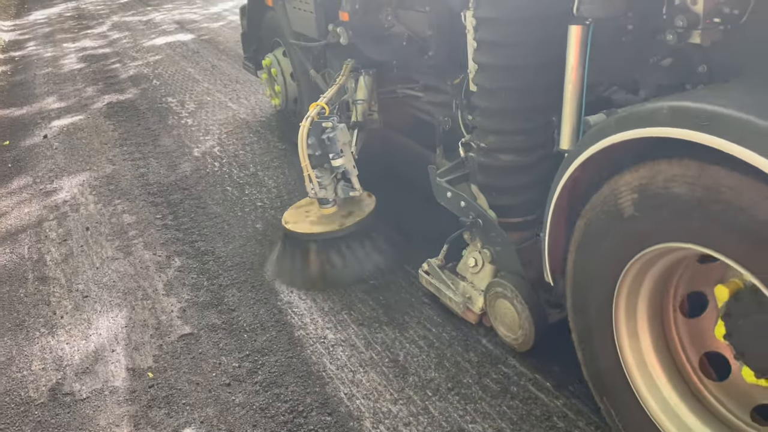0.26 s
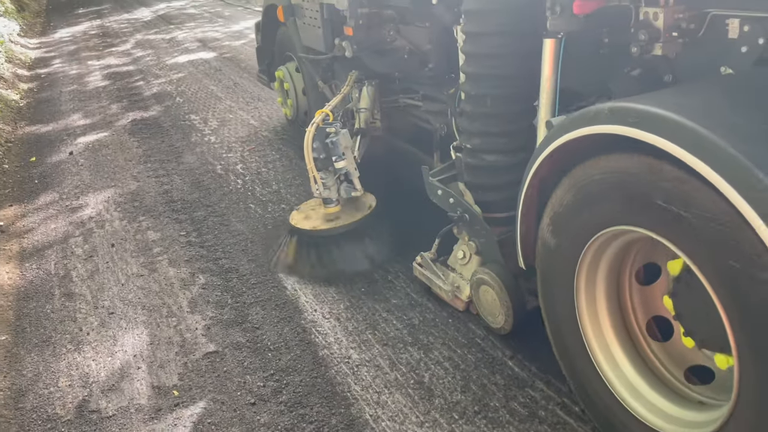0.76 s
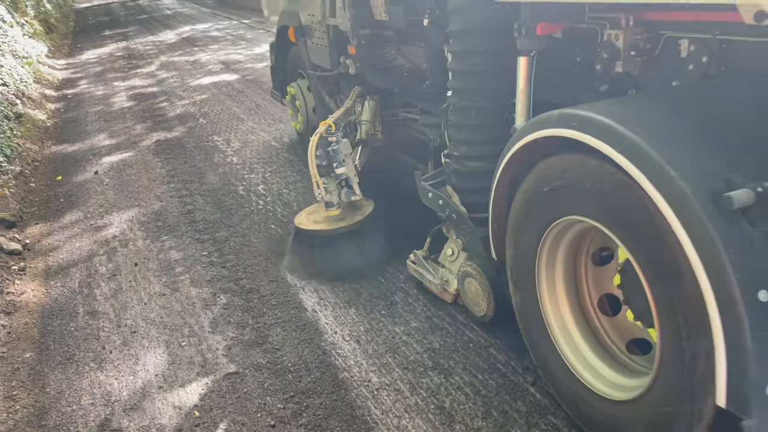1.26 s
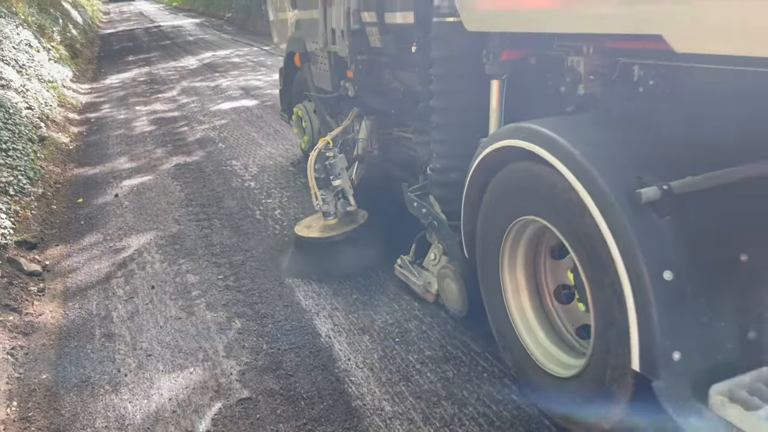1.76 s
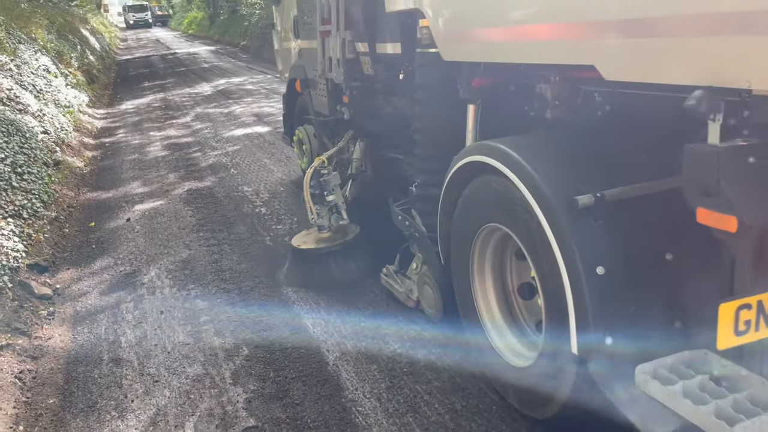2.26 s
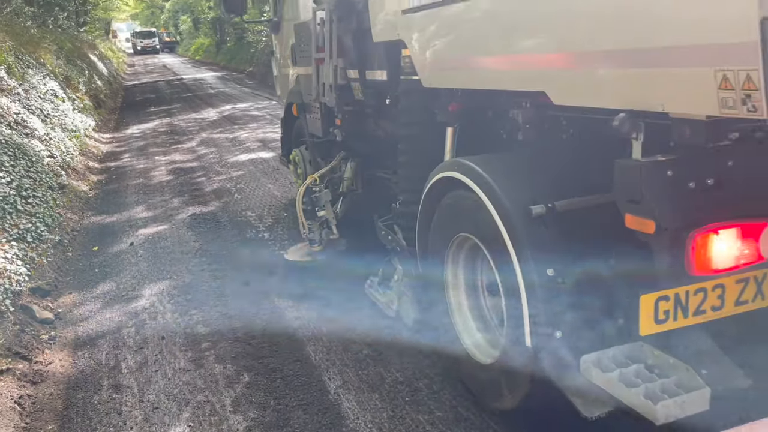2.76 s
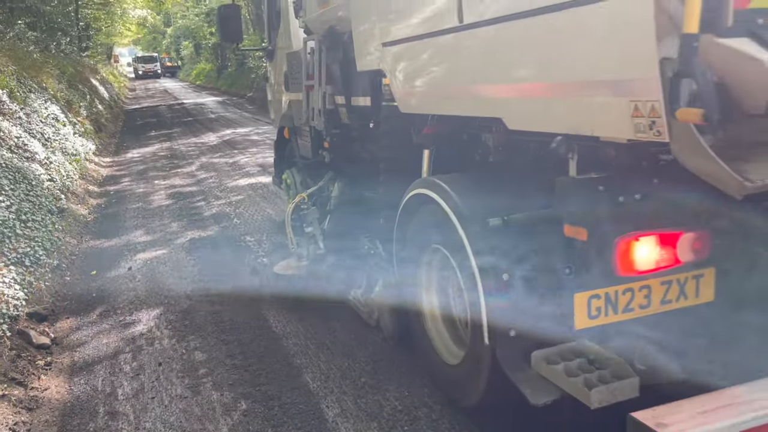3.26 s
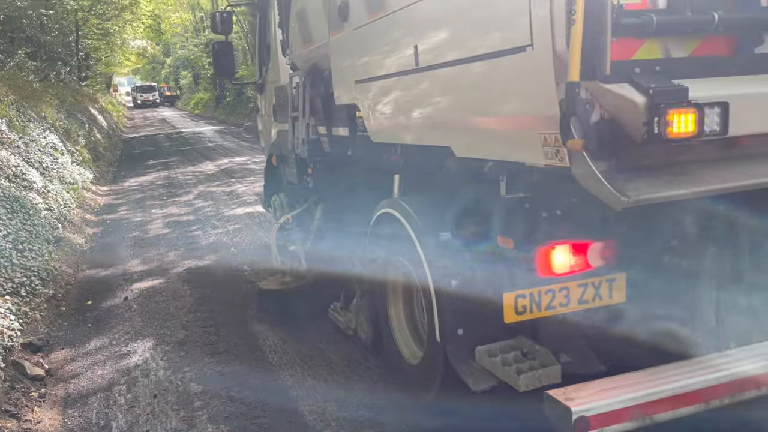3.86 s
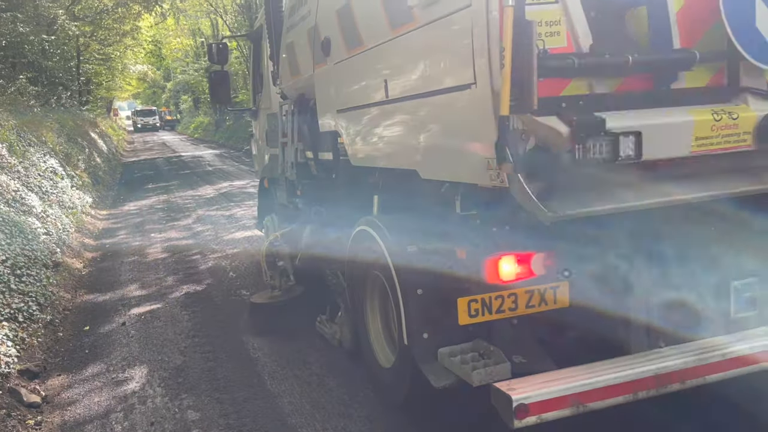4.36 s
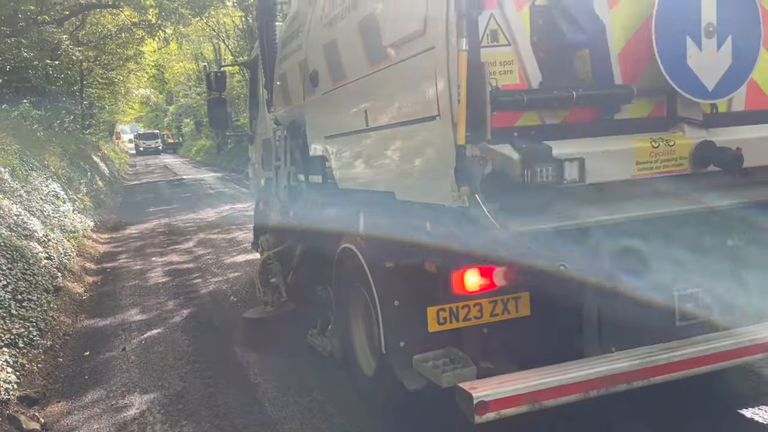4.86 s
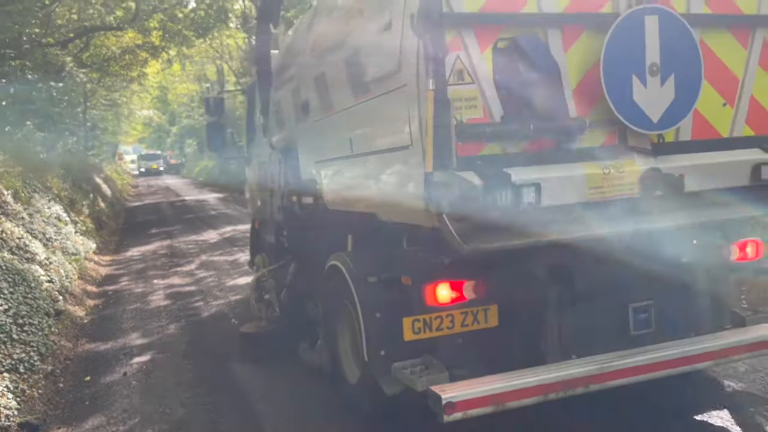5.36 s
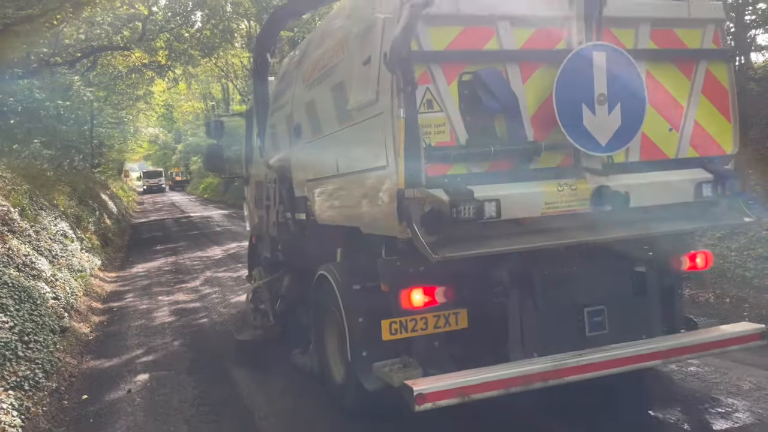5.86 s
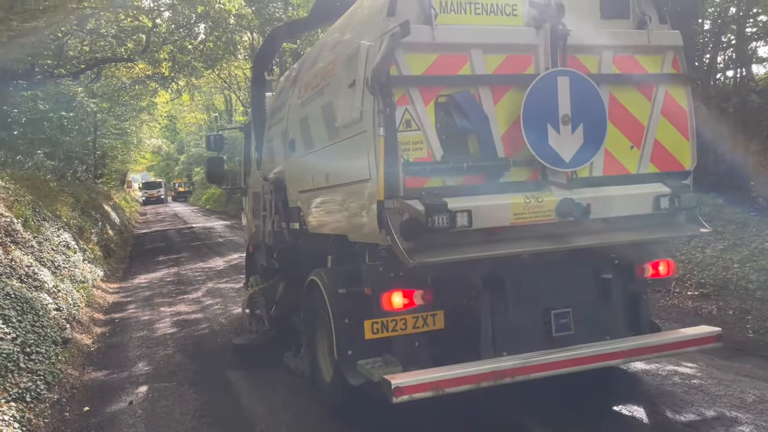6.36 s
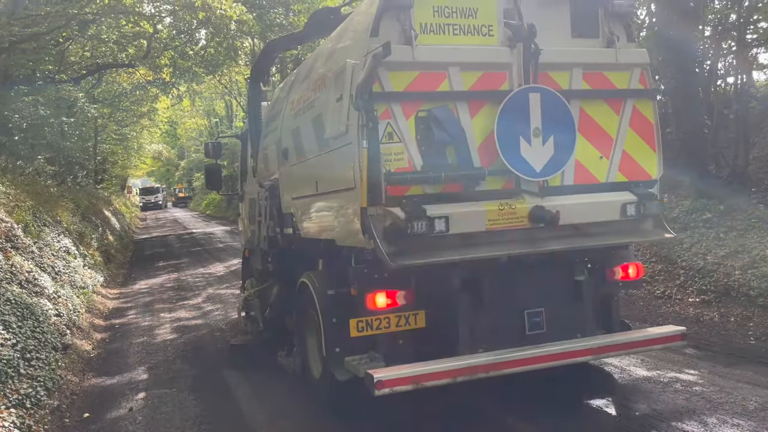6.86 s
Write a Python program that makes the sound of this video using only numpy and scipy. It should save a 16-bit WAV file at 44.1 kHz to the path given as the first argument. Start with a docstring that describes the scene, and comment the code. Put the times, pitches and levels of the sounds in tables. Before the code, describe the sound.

Outdoors on a lane, close to a slowly moving road sweeper, a dense steady rush runs throughout: bright, wide bristle hiss above a midrange roar of sucked air, with low tyre and body rumble and an uneven diesel hum beneath. A medium-pitched fan whine is clearest at the start, fading by 1 second, its overtones fluttering in and out. Near 0.8 seconds comes a soft low thud, and hollow hose notes open up, strong until about 2, then receding. Thin, faint high squeaks appear around 1.9-2.6 seconds, near 4.1, and occasionally after 5.7. Faint hydraulic whines waver inside. From about 3 seconds the brush and nozzle weaken slightly while a low, rough hopper drone grows. After 4 it chugs with irregular booming puffs and short lulls. From 5.8 gusts buffet the microphone, and the heaviest puffs come at 6.7-7 seconds, still running at the end.

```python
"""Bristles hiss on asphalt and air roars in a suction nozzle as a road sweeper crawls past along a lane.
A diesel hums at its firing rate and multiples, a fan whines at its blade rate, hydraulics whine faintly.
The viewpoint moves from the brushes to the tail: the fan's outlet drones louder through the hopper,
puffs boom in it and draught buffets the microphone. A small wheel squeaks faintly now and then.
Rushing sources are shaped noise in two ports; tonal ones are sines with wavering pitch or level."""
import sys
import numpy as np
from scipy import signal
from scipy.fft import rfft, irfft
from scipy.io import wavfile
from scipy.ndimage import uniform_filter1d

SR = 44100
rng = np.random.default_rng(int(sys.argv[2]) if len(sys.argv) > 2 else 0)


def transcribe(signal):
    """Save signal, clipped to [-1, 1], as a 16-bit WAV file at the path in sys.argv[1]."""
    frames = np.atleast_2d(signal).T
    limited = np.clip(frames, -1, 1)
    pcm = np.round(limited * 32767).astype(np.int16)
    wavfile.write(sys.argv[1], SR, pcm)


N = 313110
TIME = np.arange(N) / SR

# viewpoint, 0 beside the brushes, 1 behind the truck: time_s, viewpoint
VIEWPOINT = [(0, 0.11), (1.2, 0.0017), (2.6, 0.14), (4.2, 0.73), (5.5, 0.89), (7.1, 1)]
# brief swells and dips of the bass: middle_s, length_s, change_db
BASS_SWELLS_AND_DIPS = [(.04, .2, -4), (.27, .2, 4), (.8, 0.24, 3), (1.0, .1, -7), (1.2, .18, -11),
                        (1.64, 0.14, 4.5), (1.8, .12, -3), (2.07, 0.11, -6), (2.38, .16, 6),
                        (2.67, 0.15, 4), (2.87, .14, -6), (4.15, .25, 2), (4.5, 0.18, 4), (4.66, 0.14, -6),
                        (5.0, 0.38, -6), (5.35, 0.22, -5), (5.73, 0.22, 5.5), (5.96, .12, -12),
                        (6.1, .14, 5), (6.28, .16, -16), (6.39, .07, -8), (6.48, 0.14, 5.5),
                        (6.6, 0.25, -20)]
# puffs of exhaust air that make the hopper boom: peak_s, length_s, pitch_hz, level_db
PUFFS = [(.71, .07, 205, -22), (1.66, .09, 198, -27), (1.78, .08, 200, -27), (2.03, .08, 205, -28),
         (2.727, 0.18, 194, -23.5), (3.98, .08, 172, -24), (4.06, .08, 207, -25), (4.28, 0.087, 190, -24),
         (4.385, .08, 193, -24), (4.55, .07, 180, -24), (4.735, 0.07, 215, -22.5), (4.8, .06, 190, -24),
         (4.95, .1, 200, -24.5), (5.135, .08, 194, -23.5), (5.215, .08, 196, -24), (5.327, 0.088, 201, -21),
         (5.754, 0.2, 196, -22.5), (6.111, 0.085, 210, -20), (5.98, .07, 210, -24), (6.26, .08, 192, -24),
         (6.417, 0.18, 206, -25.5), (6.718, .14, 205, -16), (6.905, .08, 198, -16), (7.01, 0.14, 206, -18)]


def gain_of(db):
    """Decibels to amplitude."""
    return 10 ** (np.asarray(db) / 20)


def evened(x):
    """Scales to unit rms."""
    return x / np.sqrt(np.mean(x ** 2) + 1e-20)


def curves(table, t):
    """Every column of a time table, read at the times t."""
    s, *columns = np.transpose(table)
    return [np.interp(t, s, c) for c in columns]


def read(table, hz):
    """Every column of a frequency table, read on a log axis."""
    f, *columns = np.transpose(table)
    return [np.interp(np.log(hz + 1), np.log(f + 1), c) for c in columns]


def seen(table, hz, t):
    """Blends a table's beside and behind columns as the truck moves on."""
    beside, behind = read(table, hz)
    return beside + (behind - beside) * curves(VIEWPOINT, t)[0]


def facing(beside_db, behind_db):
    """Level of a source as the viewpoint moves from the truck's side to its tail."""
    return beside_db + (behind_db - beside_db) * curves(VIEWPOINT, TIME)[0]


def skirts(table, hz):
    """Fall of 24 dB an octave outside the range of a spectrum."""
    inside = np.clip(hz + 1, table[0][0], table[-1][0])
    return -24 * abs(np.log2((hz + 1) / inside))


def wander(rate_hz):
    """Slow chance of unit rms, up to about rate_hz swings a second."""
    hz = np.fft.rfftfreq(4096, TIME[-1] / 4096)
    spectrum = rfft(rng.standard_normal(4096))
    drift = irfft(spectrum * np.exp(-(hz / rate_hz) ** 2) * (hz > 0))
    return np.interp(TIME, np.linspace(0, TIME[-1], len(drift)), evened(drift))


def turns(hz, waver, rate_hz):
    """Phase in radians of a rotation or tone whose rate wavers slightly."""
    return 2 * np.pi * np.cumsum(hz * (1 + waver * wander(rate_hz))) / SR


def bump(s, length_s, t):
    """A smooth swell from 0 to 1 and back, centred on s."""
    return np.cos(np.pi * np.clip((t - s) / length_s, -.5, .5)) ** 2


def swells_db(table, t):
    """Level change made by a table of brief swells and dips."""
    return sum(db * bump(s, length_s, t) for s, length_s, db in table)


def ramp(start_s, rise_s):
    """Rises from 0 to 1 and stays there."""
    return np.clip((TIME - start_s) / rise_s, 0, 1)


def placed(x, left_db):
    """A point source, louder in the left port by left_db."""
    return x * gain_of([[left_db / 2], [-left_db / 2]])


def rush(colour, patchy_db, size, even_above_hz=7500):
    """Turbulent noise of unit rms with drifting patches, as it arrives at the two ports."""
    # left minus right level: freq_hz, beside_db, behind_db
    balance = [(60, -1.5, 0.5), (220, 0, 3.8), (550, -1.5, 1.5), (724, 1, 5.6), (1150, 1.5, 1.5),
               (1500, 11, 6.6), (1850, 2.5, 6), (2260, 8.8, 5.8), (3470, 4, 3.9), (4450, 4.5, 7.7),
               (5330, 0.5, 7.9), (6300, 1, 0.5)]
    # left-right likeness, 0 to 1: freq_hz, beside, behind
    likeness = [(60, 1, 0.98), (220, 0.97, 1), (700, 0.91, 0.75), (1190, 0.86, 0.9), (1780, 0.54, 0.46),
                (2400, 0.96, 0.76), (3860, 1, 0.97), (5570, 1, 0.49), (7100, 0.74, 0.35), (7670, 1, 1),
                (8670, 1, 1), (9550, 0.22, 0.26), (10800, 1, 1), (12500, 0.93, 0.97), (13200, .55, .55),
                (14350, 1, 1)]
    # phase lead of the left port: freq_hz, lead_rad
    lead = [(60, 0), (1350, 0.09), (1700, -0.7), (2200, 0.5), (2900, 0.2), (3300, 0), (5400, -0.5),
            (6700, 0.4), (7700, -3), (8600, -3), (9900, -5), (10600, -6.5), (12600, -6), (13400, -8),
            (14400, -3 * np.pi)]
    hop = size // 4
    t = np.arange(N // hop + 5)[:, None] * hop / SR
    hz = np.fft.rfftfreq(size, 1 / SR)
    a, b, c, d, patches = rng.standard_normal((5, len(t), len(hz)))
    patches = uniform_filter1d(patches, size=4, axis=0)  # over time
    patches = evened(uniform_filter1d(patches, size=6, axis=1))  # over frequency
    same = np.clip(seen(likeness, hz, t), 0, 1)
    tilt = gain_of(seen(balance, hz, t) * (hz < even_above_hz))
    left = a + 1j * b
    right = same * left + np.sqrt(1 - same ** 2) * (c + 1j * d)
    right = right * np.exp(-1j * read(lead, hz)[0])
    ports = np.array([left * tilt, right]) / np.sqrt(1 + tilt ** 2)
    ports = ports * gain_of(colour(hz, t) + patchy_db * patches)
    noise = signal.istft(ports.transpose(0, 2, 1), nperseg=size, noverlap=size - hop)[1]
    return evened(noise[:, :N])


def cavity(centre, width_hz):
    """Rushing air narrowed by one resonance, whose pitch in Hz is centre(t)."""
    def colour(hz, t):
        return -20 * np.log10(1 + ((hz - centre(t)) / (width_hz / 2)) ** 2)
    return rush(colour, patchy_db=0.65, size=4096)


def boom(s, length_s, hz, db):
    """A low note that swells and dies within length_s, its pitch wavering."""
    return gain_of(db) * bump(s, length_s, TIME) * np.sin(turns(hz, waver=.02, rate_hz=20.0))


def chassis(beside_db=-28.5, behind_db=-30.5, swell_share=0.5, bass_top_hz=98):
    """Low rumble of the body and tyres; its deepest part briefly swells and sinks."""
    # rumble spectrum: freq_hz, level_db
    rumble = [(20, -29), (30, -23), (42, -9), (60, -3), (82, -1), (105, -4), (125, 1.5), (165, -2),
              (210, -6), (320, -59)]

    def colour(hz, t):
        bass_db = swell_share * swells_db(BASS_SWELLS_AND_DIPS, t) * (hz < bass_top_hz)
        return read(rumble, hz)[0] + skirts(rumble, hz) + bass_db
    return gain_of(facing(beside_db, behind_db)) * rush(colour, patchy_db=0.4, size=4096)


def thud():
    """One soft low thud, a swelling and dying tone."""
    # single row: peak_s, length_s, pitch_hz, level_db
    low_thud = (0.875, 0.14, 81.5, -23)
    return boom(*low_thud)


def wheel(waver=0.002, rough_db=2.0, trim_db=-0.7):
    """A small wheel sticks and slips in short, thin squeaks, some sagging in pitch."""
    # squeaks, pitch at the middle, level before trim: start_s, length_s, pitch_hz, glide_hz_per_s, level_db
    squeaks = [(1.89, .09, 6274, 0, -42.5), (1.99, .21, 6268, -30, -41.5), (2.2, .1, 6256, -100, -44.5),
               (2.28, .17, 6154, -80, -42.5), (2.48, .14, 6082, -450, -46), (4.06, .12, 6282, 0, -41.5),
               (4.17, .15, 6282, 0, -49.5), (4.39, .08, 6284, 0, -48.5), (5.74, .14, 6282, 0, -48.5),
               (6.24, .15, 6278, 0, -46.5), (6.45, .09, 6222, 0, -47), (6.57, .08, 6295, 0, -49.5)]
    out = np.zeros(N)
    drift = 1 + waver * wander(60)
    rough = gain_of(rough_db * wander(50))
    for s, length_s, hz, glide, db in squeaks:
        age_s = np.clip(TIME - s, 0, length_s)
        pitch_hz = (hz + glide * (age_s - length_s / 2)) * drift
        swell = np.sqrt(abs(np.sin(np.pi * age_s / length_s)))
        out += gain_of(db) * swell * np.sin(2 * np.pi * np.cumsum(pitch_hz) / SR)
    return placed(out * rough * gain_of(trim_db), left_db=1.0)


def pumps(flutter_db=2.5):
    """Faint wavering whines of the hydraulics."""
    # whines of pumps and drives: pitch_hz, beside_db, behind_db
    drives = [(421.6, -42.5, -41.5), (644, -47, -51), (848, -70, -52), (1102, -49.5, -57),
              (1857, -64, -55.5)]
    whine = np.zeros(N)
    for hz, beside_db, behind_db in drives:
        level_db = facing(beside_db, behind_db) + flutter_db * wander(3.8)
        whine += gain_of(level_db) * np.sin(turns(hz, waver=.002, rate_hz=7.0))
    return placed(whine, left_db=0.5)


def engine(firing_hz=66.57, beside_db=-33.0, behind_db=-34.0, uneven_db=0.8):
    """A governed diesel: the firing tone and a few of its multiples; the hum swells and sinks unevenly."""
    # firing orders: multiple_of_firing_rate, relative_db
    orders = [(1, 0), (2, -20), (3, -6.5), (5, -11), (6, -12)]
    phase = turns(firing_hz, waver=0.0019, rate_hz=3.0)
    hum = sum(gain_of(db) * np.sin(k * phase + 2 * np.pi * rng.random()) for k, db in orders)
    swell_db = swells_db(BASS_SWELLS_AND_DIPS, TIME) + uneven_db * wander(9.6)
    return placed(hum * gain_of(facing(beside_db, behind_db) + swell_db), left_db=1.0)


def fan(blade_hz=463.5, trim_db=-0.3, flutter_db=1.6):
    """Blade-passing tone; harmonics swell and fade as their paths change, and flutter in the air stream."""
    # blade tone before trim: time_s, level_db
    first = [(0, -29), (.07, -26), (.2, -29.5), (.37, -32.5), (.75, -38), (1.2, -45), (1.8, -44),
             (2.3, -56), (2.6, -43.5), (2.95, -42), (3.35, -36), (4.35, -37), (4.6, -40), (5.3, -42),
             (5.55, -38), (5.8, -40), (6.0, -32), (6.16, -39.5), (6.45, -40.5), (6.65, -54), (7.0, -37),
             (7.1, -45)]
    # second harmonic before trim: time_s, level_db
    second = [(0, -38), (.3, -39), (.42, -55), (.85, -43), (.95, -48), (1.25, -39), (1.7, -41), (1.87, -33),
              (2.15, -33.5), (2.28, -39.5), (2.4, -38.5), (2.5, -32), (2.62, -36.5), (2.82, -35),
              (3.1, -43), (3.47, -44), (3.58, -57), (4.3, -54), (4.6, -39), (4.78, -47), (4.94, -42.5),
              (5.03, -53), (5.25, -41), (5.68, -43), (5.85, -46), (6.05, -38.5), (6.2, -40.5),
              (6.45, -35.5), (6.62, -39.5), (6.8, -36), (7.1, -50)]
    # third harmonic before trim: time_s, level_db
    third = [(0, -52), (.5, -46), (1.2, -49), (1.43, -40), (1.75, -58), (2.6, -47), (3.0, -53), (3.3, -45),
             (4.4, -56), (7.1, -55)]
    phase = turns(blade_hz, waver=0.0013, rate_hz=7.3)
    whine = np.zeros(N)
    for harmonic, fading in enumerate([first, second, third], 1):
        level_db = curves(fading, TIME)[0] + flutter_db * wander(12)
        whine += gain_of(level_db) * np.sin(harmonic * phase)
    return placed(whine * gain_of(trim_db), left_db=3.0)


def hose(lower_width_hz=46, upper_width_hz=110, upper_ratio=1.425, pulsing_db=1.0):
    """The air column of the suction hose gives two hollow notes, which open up early on, drift and recede."""
    # hose notes: time_s, lower_pitch_hz, lower_db, upper_db
    notes = [(0, 373, -49, -44), (.62, 373, -43, -47), (.8, 375, -27.5, -32), (1.0, 380, -26, -32.5),
             (1.1, 386, -34, -33), (1.35, 386, -30.5, -34), (1.65, 394, -33.5, -38),
             (1.95, 398, -27, -31.5), (2.3, 388, -33.5, -44), (3.2, 384, -32, -35), (3.8, 390, -32, -44),
             (4.5, 380, -35, -49), (7.1, 382, -40, -48)]
    _, lower_db, upper_db = curves(notes, TIME)
    lower = gain_of(lower_db) * cavity(lambda t: curves(notes, t)[0], lower_width_hz)
    upper = gain_of(upper_db) * cavity(lambda t: upper_ratio * curves(notes, t)[0], upper_width_hz)
    return (lower + upper) * gain_of(pulsing_db * wander(15))


def outlet(saturation=0.67, yield_db=-4.5, chug_db=2.0, chug_hz=22):
    """Exhaust air chugs through the hopper's close low modes as a rough drone that gives way to each puff."""
    # hopper modes: beside_hz, behind_hz, width_hz, relative_db
    modes = [(176, 172, 40, -7), (193, 203.4, 52, 0), (219, 229, 34, -5)]
    # drone as the outlet turns toward the microphone: time_s, level_db
    turning = [(0, -32.5), (3.4, -29.5), (4.1, -27), (5.0, -26), (5.5, -24.5), (6.0, -26), (6.5, -26.5),
               (6.68, -24), (7.1, -22)]
    # lulls between the puffs: bottom_s, length_s, change_db
    lulls = [(4.18, .06, -10), (4.6, .08, -11), (4.85, .1, -14), (5.08, .05, -8), (5.275, 0.061, -14),
             (5.87, 0.12, -6), (6.04, .07, -7), (6.19, 0.081, -14), (6.54, .14, -12), (6.8, 0.07, -5)]
    drone = np.zeros((2, N))
    for beside_hz, behind_hz, width_hz, db in modes:
        def centre(t):
            return beside_hz + (behind_hz - beside_hz) * curves(VIEWPOINT, t)[0]
        drone += gain_of(db) * cavity(centre, width_hz)
    drone = evened(drone)
    swing = abs(signal.hilbert(drone.mean(0)))
    drone = drone / np.sqrt(1 + (saturation * swing) ** 2)  # limits the strongest swings
    drone = evened(drone * gain_of(chug_db * wander(chug_hz)))
    puffing = sum(bump(s, length_s, TIME) for s, length_s, _, _ in PUFFS)
    return gain_of(curves(turning, TIME)[0] + swells_db(lulls, TIME) + yield_db * puffing) * drone


def surges():
    """Stronger puffs of exhaust air swell the hopper's note."""
    return placed(sum(boom(*row) for row in PUFFS), left_db=3.5)


def draught(gusty_db=3.0, across=0.76, rise_s=.11, fall_s=.35):
    """Eddies of the exhaust air hit the microphone, pushing on one port while they pull on the other."""
    # eddy spectrum: freq_hz, level_db
    buffet = [(20, -24), (32, -14), (53, 1), (75, -3), (130, -3), (200, -5), (330, -25), (600, -32)]
    # gusts: start_s, length_s, level_db
    gusts = [(4.55, .65, -43), (5.6, .25, -38), (5.785, 1.35, -30.5)]
    hz = np.fft.rfftfreq(N, 1 / SR)
    spectrum = rfft(rng.standard_normal((2, N)))
    eddies = irfft(spectrum * gain_of(read(buffet, hz)[0] + skirts(buffet, hz)), N)
    eddies = evened(eddies - across * eddies[::-1])
    force = np.zeros(N)
    for s, length_s, db in gusts:
        force += gain_of(db) * ramp(s, rise_s) * (1 - ramp(s + length_s, fall_s))
    return eddies * force * gain_of(gusty_db * wander(25))


def spreading_db(near_m=2.0):
    """Sound from the brushes and nozzle weakens with distance."""
    # distance to brushes and nozzle: time_s, distance_m
    path = [(0, 1.98), (1.0, 2.2), (2.2, 2.71), (3.0, 3), (3.6, 3.5), (5.0, 3.52), (6.4, 3.7), (7.1, 3.46)]
    return -20 * np.log10(curves(path, TIME)[0] / near_m)


def suction(near_db=-23.0, falloff=1.105, unsteady_db=.5):
    """Air roars through the broad resonances of the nozzle."""
    # nozzle spectrum: freq_hz, beside_db, behind_db
    nozzle = [(133, -31, -28), (195, -6.5, 1.5), (258, -2, -2), (316, -2, -1), (402, -5.5, -6),
              (436, -13, -5), (514, -5.5, -6), (612, -8.5, -10), (786, -12.5, -11.5), (834, -10, -9.5),
              (1217, -13, -11.5), (1384, -20, -16.5), (1810, -33, -33)]
    roar = rush(lambda hz, t: seen(nozzle, hz, t) + skirts(nozzle, hz), patchy_db=1.33, size=4096)
    return gain_of(near_db + falloff * spreading_db() + unsteady_db * wander(11)) * roar


def reflections_db(hz, t, climb_per_s=.014):
    """Bands of the hiss swell or sink and creep upward as the truck pulls ahead."""
    # reflections from road and bodywork: middle_s, length_s, freq_hz, width_hz, change_db
    bands = [(2.9, 2, 2480, 130, 2.5), (3.5, 3.0, 3320, 260, 1.6), (3.4, 2.9, 4200, 140, 3),
             (4.6, 2.2, 1620, 130, -2.2), (4.9, 3.6, 5980, 230, -2.4), (4.9, 3.4, 6920, 180, 1)]
    change_db = 0
    for s, length_s, middle_hz, width_hz, db in bands:
        centre_hz = middle_hz * (1 + climb_per_s * (t - s))
        change_db = change_db + db * bump(s, length_s, t) * np.exp(-((hz - centre_hz) / width_hz) ** 2)
    return change_db


def brushes(near_db=-25.0, scrape_db=0.21, turn_db=-0.1, turn_hz=3.1):
    """Countless bristles scrape the road; the worn brush presses a little harder once a turn."""
    # bristle spectrum: freq_hz, beside_db, behind_db
    bristles = [(900, -25, -30), (1485, 0.1, 0.5), (2030, -1.7, -1.2), (2460, 0.7, -0.4),
                (2700, -2.5, -1.1), (3020, 1.1, 0), (4530, -1.9, 0.5), (5080, -2, -0.2), (6100, -4.5, -4),
                (7200, -5, -2), (9050, -1.5, -2), (11180, -4.5, -5), (12600, -10, -9.5), (15400, -4.5, -5)]

    def colour(hz, t):
        return seen(bristles, hz, t) + skirts(bristles, hz) + reflections_db(hz, t)
    hiss = rush(colour, patchy_db=1.34, size=2048)
    pressure_db = turn_db * np.sin(2 * np.pi * turn_hz * TIME) + scrape_db * wander(40)
    return hiss * gain_of(near_db + spreading_db() + pressure_db)


def scene():
    """Rushing air and bristles, with the machine's tones inside them."""
    air = suction() + hose() + outlet() + draught()
    tones = engine() + fan() + pumps() + wheel() + surges() + thud()
    return brushes() + chassis() + air + np.sqrt(2) * tones  # sqrt(2): tone levels are rms


def record(dry, low_cut_hz=33, edge_hz=15650):
    """The microphone's low cut and the recorder's band limit."""
    low_cut = signal.butter(4, low_cut_hz, "highpass", fs=SR, output="sos")
    low_pass = signal.firwin(511, edge_hz, window=("kaiser", 9), fs=SR)
    return signal.oaconvolve(signal.sosfilt(low_cut, dry), low_pass[None], "same")


dry = scene()
out = record(dry)
transcribe(out)
```